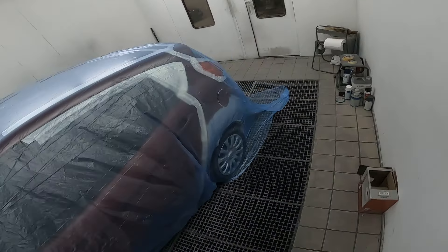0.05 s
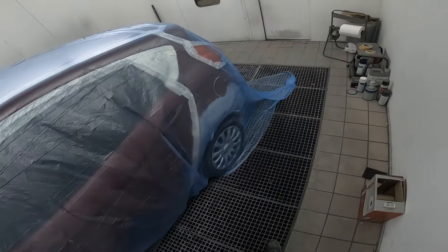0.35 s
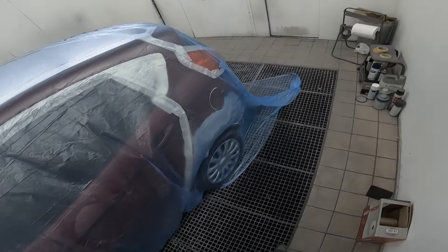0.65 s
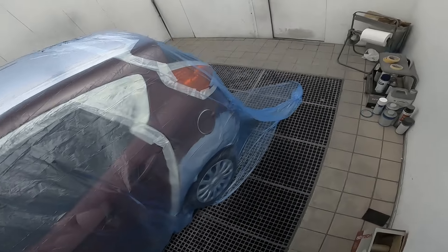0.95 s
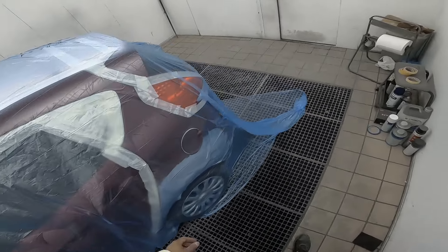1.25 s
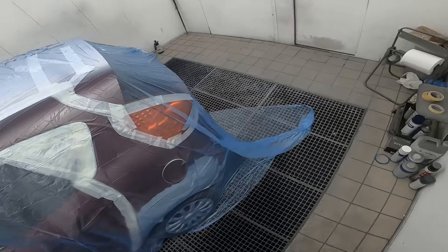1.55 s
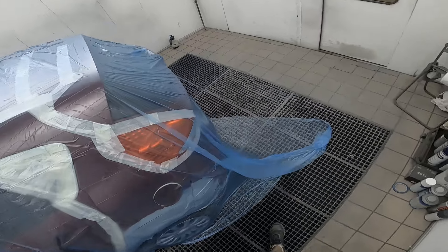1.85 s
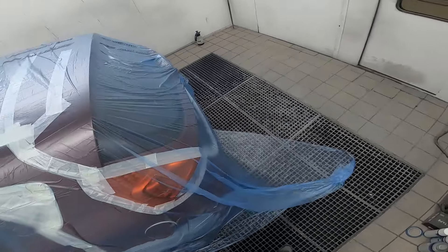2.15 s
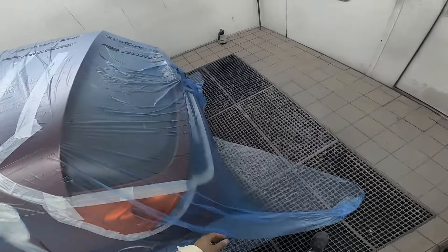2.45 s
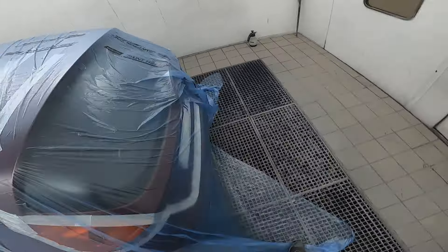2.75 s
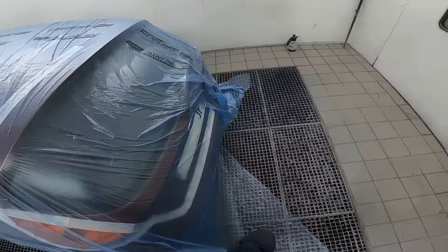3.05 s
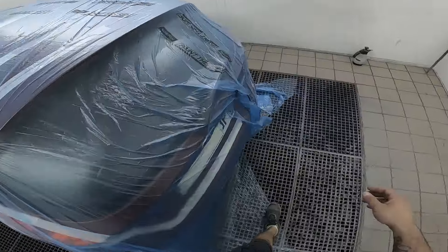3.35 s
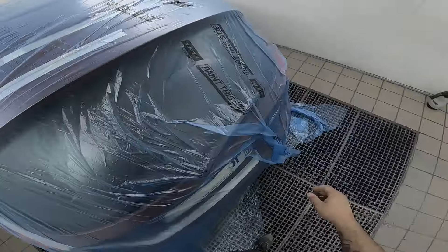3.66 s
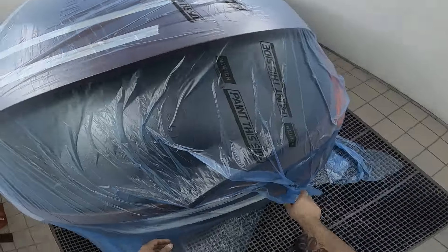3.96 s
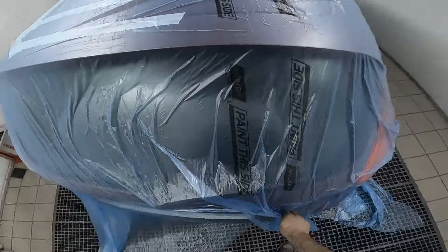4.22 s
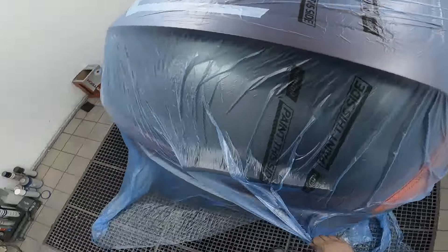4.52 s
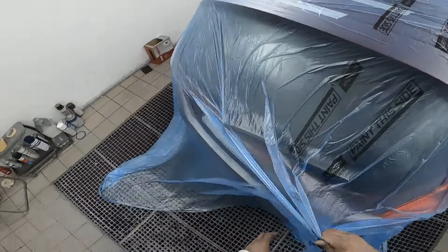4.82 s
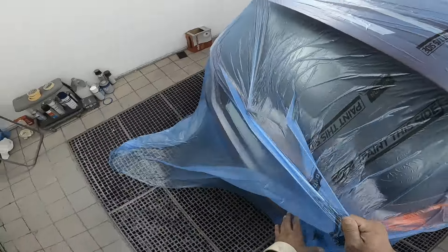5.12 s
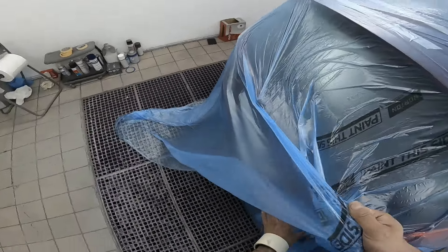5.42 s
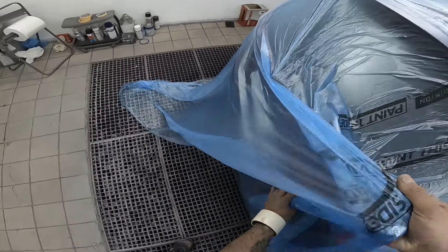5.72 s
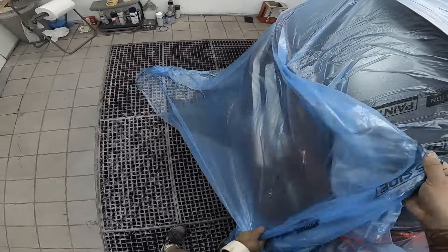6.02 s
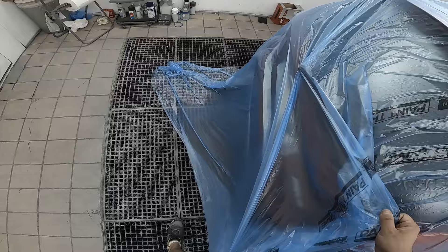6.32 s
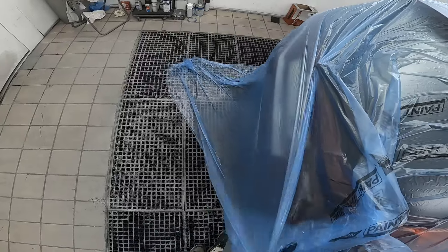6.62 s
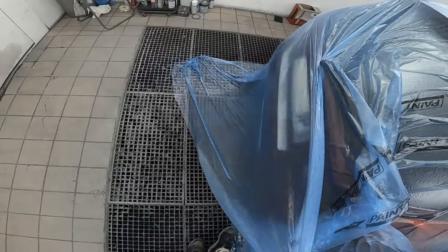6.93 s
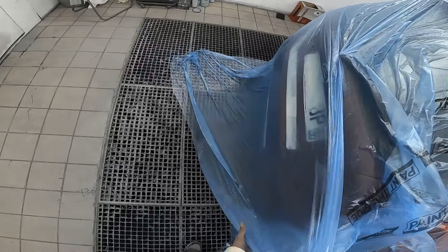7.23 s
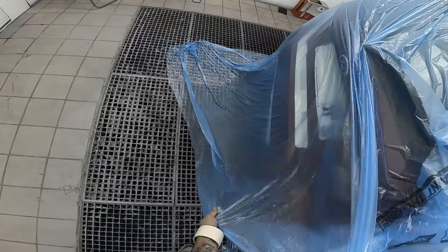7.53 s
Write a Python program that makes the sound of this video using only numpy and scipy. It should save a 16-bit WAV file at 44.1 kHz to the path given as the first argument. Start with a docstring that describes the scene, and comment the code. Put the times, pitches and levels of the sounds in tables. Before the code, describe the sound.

Deep, steady ventilation fills a car painting booth with rumble, hum and a light hiss of air, its tone changing slightly as the microphone is carried along. Shoes and clothes rustle faintly at the start. Later, thin plastic sheeting over a car is pulled several times nearby, slithering and crinkling under the fan noise. The strongest pulls bring a few crisp snaps, reflected by the hard walls.

```python
"""In a paint booth, a big fan hums, roars and hisses while the microphone walks round a masked car.
The wheel throbs, its blades hum and turbulent air rushes through the ducts and grates.
The walk passes through the booth's standing waves, so the boom shifts in pitch.
Soft shoe scuffs and clothing brushes come first; later a hand draws out the thin masking film.
As it slides, tiny wrinkles flip in a dense, soft crinkle with a few snaps, echoed by the hard walls."""
import sys
import numpy as np
from scipy import signal
from scipy.fft import rfft, irfft, next_fast_len
from scipy.io import wavfile
from scipy.ndimage import uniform_filter1d

SR = 44100
rng = np.random.default_rng(int(sys.argv[2]) if len(sys.argv) > 2 else 0)


def put_to_file(sound):
    """Save the sound as 16-bit audio at rate SR, in the file named by the first command-line argument."""
    columns = np.atleast_2d(sound).T  # one column per channel
    safe = np.clip(columns, -1, 1)
    whole_steps = np.round(safe * 32767)
    wavfile.write(sys.argv[1], SR, whole_steps.astype(np.int16))


N = 343098
TIME = np.arange(N) / SR
PADDED = next_fast_len(N + 4096, True)
HZ = np.fft.rfftfreq(PADDED, 1 / SR)


def amp(db):
    """Decibels to gain."""
    return 10 ** (np.asarray(db) / 20)


def unit_rms(x):
    """Scales to an rms of one."""
    return x / np.sqrt(np.mean(x ** 2) + 1e-20)


def curve(rows, hz, column=1):
    """One column of a table, interpolated on a log-frequency axis."""
    columns = np.transpose(rows)
    return np.interp(np.log(hz + 1), np.log(columns[0] + 1), columns[column])


def coloured(x, gain):
    """Filters by a gain for each frequency."""
    return irfft(rfft(x, PADDED) * gain, PADDED)[..., :N]


def wander(rate_hz):
    """A smooth random drift with an rms of one."""
    return unit_rms(coloured(rng.standard_normal(PADDED), np.exp(-(HZ / rate_hz) ** 2)))


def swell(at, spread):
    """A bell-shaped fade in and out, reaching 1 at the given second."""
    return np.exp(-0.5 * ((TIME - at) / spread) ** 2)


def gesture(at, rise, hold, decay, steepness=1.1):
    """A move builds up to a moment, holds, and dies away."""
    building = (np.maximum(at - TIME, 0) / rise) ** steepness
    dying = np.maximum(TIME - at - hold, 0) / decay
    return np.exp(-building - dying)


def ports(pair, image):
    """Turns two unrelated signals into what two close microphone ports hear."""
    common, separate = rfft(pair, PADDED)
    coherence = np.clip(curve(image, HZ), 0, 1)
    lead = curve(image, HZ, column=2)
    pan = amp(curve(image, HZ, column=3) / 2)
    right = (coherence * common + np.sqrt(1 - coherence ** 2) * separate) * np.exp(-1j * lead)
    return irfft(np.array([common * pan, right / pan]), PADDED)[:, :N]


def airflow(level_db=-19.5, splits_hz=(48, 135, 1400), gust_db=1.0, gust_hz=5):
    """Turbulent air rumbles, booms, roars and hisses; all but the hiss flutter in gusts."""
    # Tone of the air in fan and grates. Each row: frequency in Hz, relative level in dB.
    spectrum = [(8, -26.5), (22, -8), (42, -5.5), (85, -2.5), (160, -6.5), (305, -13.5), (450, -22.5),
                (790, -30.5), (1000, -32), (2000, -43), (4800, -49.5), (7700, -59), (10500, -72.5),
                (12500, -74.5), (15500, -91)]
    # Duct rumble, boom, roar and grate hiss each swell or fade around one spot on the walk.
    # Each row: usual gain in dB, time at the spot and spread in seconds, change there in dB.
    bands = [(-2.5, 8.2, 1, 4), (0.5, 5.2, 0.51, -0.5), (.5, 3.5, 1.2, -0.5), (0.9, 2, 1.36, -2.5)]
    air = amp(level_db) * unit_rms(coloured(rng.standard_normal((2, N)), amp(curve(spectrum, HZ))))
    lowpasses = [1 / (1 + (HZ / edge) ** 8) for edge in splits_hz]
    bandpasses = np.diff(lowpasses, axis=0, prepend=0, append=1)
    gains = [amp(db + change_db * swell(at, spread)) for db, at, spread, change_db in bands]
    rumble, boom, roar, hiss = (coloured(air, band) * gain for band, gain in zip(bandpasses, gains))
    return (rumble + boom + roar) * amp(gust_db * wander(gust_hz)) + hiss


def fan(shaft_hz=16.152, blades=10, sway_rad=0.048, sway_hz=0.66):
    """The unbalanced wheel throbs at one and two times its speed; the passing blades hum above it."""
    # Fan tones, low to high, dipping at a node or swelling at an antinode on the walk.
    # Each row: usual level in dB, time at the spot and spread in seconds, change there in dB.
    tones = [(-24.5, 5, 0.72, 0), (-27, 0.77, 1.5, -15.5), (-28.5, 1.3, 0.1, -7.5), (-44.5, 3.75, 0.29, 9)]
    angle = 2 * np.pi * (shaft_hz * TIME + rng.random())
    out = np.zeros(N)
    for order, (db, at, spread, change_db) in zip((1, 2, blades, 2 * blades), tones):
        # the phase of each tone sways as the microphone moves
        tone = np.sqrt(2) * np.sin(order * angle + sway_rad * wander(sway_hz))
        out += amp(db + change_db * swell(at, spread)) * tone
    return out


def standing_waves():
    """The fan drives narrow room modes, each loudest as the microphone passes its antinode."""
    # Booth modes. Each row: pitch and width in Hz, level in dB, antinode time and spread in seconds.
    modes = [(49, 4.1, -35, 0.2, 2.3), (57.4, 5.8, -19, 0.43, 1.5), (75.8, 3.9, -20, 2.27, 0.31),
             (75.4, 2.9, -28.5, 4.6, 1.5), (85.4, 6.5, -21, 2, 0.38), (105.2, 6.4, -18.5, 0.98, 0.42),
             (97.54, 4.5, -24.5, 4.3, 1.35), (97.8, 14, -21.5, 7.27, 0.26), (128.5, 7, -23.5, 1.45, 0.48),
             (129, 3.2, -22.5, 3.15, 0.64), (160.8, 1.3, -27.5, 0.64, 0.23), (152.2, 5, -25.5, 4.49, 0.2),
             (159.8, 14, -22, 7.38, 0.54), (173, 6, -22, 4.53, 0.18), (178.8, 6.5, -26.5, 5.24, 1.3),
             (211.8, 5, -32.5, 3.6, 2.7), (232.4, 8.1, -29, 5.4, 1.33), (251.9, 3.4, -33.5, 1.42, 0.85),
             (255.4, 7.1, -27.5, 6.57, 1.18), (301.5, 3.7, -30, 2.85, 0.32), (322.8, 8, -31.5, 3.62, 0.58),
             (371.6, 12, -35.5, 6.42, 0.75), (404, 10.4, -40, 7.1, 5.4), (491, 24.4, -39, 11.8, 6.8),
             (506, 5, -40, 1.2, .25), (576, 13, -49, 2.5, 2), (655.4, 30, -46, 6.3, 3.1),
             (934, 30, -51, 5, 4.6)]
    drive = rfft(rng.standard_normal(PADDED))
    out = np.zeros(N)
    for hz, width, db, antinode, spread in modes:
        mode = irfft(drive / (1 + 1j * (HZ - hz) / width) ** 2, PADDED)[:N]
        nearness = swell(antinode, spread)
        rms_nearby = np.sqrt(np.average(mode ** 2, weights=nearness ** 2))
        out += amp(db) * nearness * mode / rms_nearby
    return out


def movements(settle_s=0.14, grip_s=4.3, grip_rise_s=0.07, slither_db=-49.5):
    """Effort and crispness (-1 dull to 1 bright) of shoes and clothes, then of the hand on the film."""
    # Two faint rustles, then draws of the sheet.
    # Each row: time at full strength, build and hold in seconds, level in dB, crispness.
    draws = [(0.094, 0.11, 0.2, -63, -.4), (3.62, 0.25, .08, -59, -.45), (4.522, 0.095, 0.07, -42, 0.0054),
             (4.97, 0.26, 0.1, -41, -0.085), (5.303, 0.05, 0.075, -47.5, 0.15),
             (6.072, 0.082, 0.037, -37.5, -0.023), (6.209, 0.054, 0.024, -38.5, 0.1),
             (6.31, 0.033, 0.05, -35.5, 0.13), (6.669, 0.21, 0.27, -41, -0.077),
             (7.097, .1, 0.17, -46.5, -0.029), (7.742, 0.15, .03, -38, 0.075)]
    # Soft shoe scuffs and clothing brushes come first, then quick flicks of the film.
    # Each row: time and decay in seconds, level in dB, crispness.
    touches = [(.265, .02, -55.5, -0), (.385, 0.022, -53.5, -0), (.415, 0.024, -46, -.55),
               (.82, 0.054, -61.5, 0.2), (2.795, 0.035, -58.5, 0.6), (2.88, .04, -61.5, .3),
               (3.74, 0.044, -59, -0.1), (4.512, 0.022, -42, 0), (5.105, 0.018, -48, 0),
               (5.262, .018, -52, 0.2), (5.752, 0.024, -44.5, 0), (5.83, .016, -50, .7),
               (5.858, 0.027, -43, 0.3), (6.272, 0.012, -33, -0.15), (6.382, 0.018, -33.5, -0.16)]
    moves = [amp(db) * gesture(at, build, hold, settle_s) for at, build, hold, db, _ in draws]
    moves += [amp(db) * gesture(at, rise=0.6 * decay, hold=0.5 * decay, decay=decay)
              for at, decay, db, _ in touches]
    # once gripped, the sheet keeps slithering softly between draws
    slither = amp(slither_db) * np.clip((TIME - grip_s) / grip_rise_s, 0, 1)
    effort = np.linalg.norm([*moves, slither], axis=0)  # their powers add
    bite = sum(move * crispness for move, (*_, crispness) in zip(moves, draws + touches))
    return effort, bite / (effort + 1e-9)


def wrinkles(effort, per_s=6000, size_db=2.5, clump_db=1, clump_hz=70):
    """Tiny wrinkles flip in clumps, more of them the harder the move."""
    rate = per_s * np.sqrt(effort / effort.max()) + per_s / 10
    sizes = amp(size_db * np.minimum(rng.exponential(1, (2, N)), 4))
    signs = rng.choice([-1, 1], (2, N))
    flips = rng.random((2, N)) < rate / SR
    clicks = sizes * signs * flips / np.sqrt(rate)
    return unit_rms(clicks) * amp(clump_db * wander(clump_hz))


def scuffs_and_film(slide_db=-1.5, room_db=-6, snap_db=3.5, crisp_hz=3500):
    """Early scuffs, then the film's wrinkles, sliding hiss and snaps, all echoed by the booth."""
    # Tone of the crinkle. Each row: frequency in Hz, relative level in dB.
    spectrum = [(300, -10), (1000, -4), (2000, -3.5), (4200, -1.5), (5500, -4.5), (7600, -9),
                (10000, -17.5), (13000, -18), (15500, -29.5)]
    # Stereo image of the crinkle. Each row: frequency in Hz, coherence, left lead in radians,
    # left minus right in dB.
    image = [(1000.0, 0.75, -0.16, 2.2), (2200.0, 0.72, -0.76, 1.4), (3500.0, 0.64, -0.94, 0.1),
             (5200.0, 0.43, -1.3, -1.4), (7000.0, 0.42, -2.73, -0.3), (9500.0, 0.27, -1.74, -4.4),
             (12500.0, 0.37, -3.09, 0.9), (15000.0, 0.25, -3.72, -2.9)]
    effort, crispness = movements()
    rustle = effort * (wrinkles(effort) + amp(slide_db) * rng.standard_normal((2, N)))
    # a quick move bends the film more sharply, which adds treble; a soft brush has less
    treble = coloured(rustle, HZ ** 2 / (HZ ** 2 + crisp_hz ** 2))
    colour = unit_rms(amp(curve(spectrum, HZ)))
    crinkle = coloured(rustle + crispness * treble, colour) + ringing_panels()
    snaps = amp(snap_db) * coloured(creases(), colour)
    echo = amp(room_db) * booth_reverb(crinkle + snaps)
    return ports(crinkle + echo, image) + snaps


def booth_reverb(x):
    """Dense reflections from hard walls; the treble rings longer than the mids."""
    # Ring of the tiled booth. Each row: frequency in Hz, seconds to fall by 60 dB.
    ring_times = [(500, 0.56), (4000, 0.99), (14000, 0.94)]
    hz, t, noise = signal.stft(rng.standard_normal((2, SR)), SR, nperseg=256)
    fade = amp(-60 * t / curve(ring_times, hz)[:, None])
    tail = signal.istft(noise * fade, SR, nperseg=256)[1]
    return signal.fftconvolve(x, tail / np.linalg.norm(tail[0]), axes=1)[:, :N]


def creases(decay_s=0.00034, length=512):
    """A single crease snaps over in a millisecond burst of buckling, off to one side."""
    # Crease snaps. Each row: start in seconds, relative peak in dB, left minus right in dB.
    snaps = [(.2686, -37, -8), (5.4092, -30, -1), (5.7495, -30, -2), (6.0445, -28, -11.5), (6.2664, -23, 3),
             (6.2783, -31, 2), (6.3984, -31, -6)]
    out = np.zeros((2, N))
    for at, db, pan_db in snaps:
        burst = rng.standard_normal((2, length)) * np.exp(-np.arange(length) / SR / decay_s)
        gains = amp([[db + pan_db / 2], [db - pan_db / 2]])
        start = round(at * SR)
        out[:, start:start + length] += burst / abs(burst).max() * gains
    return out


def ringing_panels():
    """A stretch of film hisses in a band of its own: high when pulled taut, low as it falls slack."""
    # Ringing stretches. Each row: peak time and spread in seconds, centre and width in Hz, level in dB.
    stretches = [(5.04, .07, 5200, 500, -50), (6.25, .07, 7300, 600, -46.5),
                 (6.283, .016, 4900, 500, -38.5), (6.46, .05, 1400, 600, -43),
                 (6.82, .12, 5000, 700, -48.5)]
    out = np.zeros((2, N))
    for at, spread, hz, width, db in stretches:
        band = coloured(rng.standard_normal((2, N)), 1 / (1 + ((HZ - hz) / width) ** 2))
        out += amp(db) * swell(at, spread) * unit_rms(band)
    return out


def scene():
    """Air, fan tones and room modes under the scuffs and the handled film."""
    # Stereo image of the air. Each row: frequency in Hz, coherence, left lead in radians,
    # left minus right in dB.
    image = [(30.0, 0.991, 0.4, -5.6), (90.0, 0.996, 0.37, -2.0), (200.0, 0.982, 0.4, 0.8),
             (400.0, 0.91, 0.3, 1.8), (700.0, 0.72, 0.06, 3.2), (1100.0, 0.7, -0.19, 3.1),
             (2200.0, 0.63, -0.73, 4.2), (4500.0, 0.32, -0.4, 1.7), (7000.0, 0.12, -3.28, 0.8),
             (12000.0, 0.23, -3.08, 0.9)]
    common, diffuse = airflow()
    common = common + fan() + standing_waves()  # long waves reach both ports
    return ports(np.array([common, diffuse]), image) + scuffs_and_film()


def record(dry, bass_hz=260, knee_db=-20, squeeze=0.67, smooth_s=0.016, top_hz=15700):
    """The microphone colours the treble, a compressor holds down bass swells, and the top is cut."""
    # Ripple of the microphone's ducts. Each row: frequency in Hz, gain in dB.
    ripple = [(4500, 0), (5600, 1.5), (6600, 0), (7800, 3), (8500, 0), (10200, 3), (11000, -1.5),
              (12500, -3)]
    heard = coloured(dry, amp(curve(ripple, HZ)))
    bass = coloured(heard, 1 / (1 + (HZ / bass_hz) ** 2) ** 2)
    window = int(smooth_s * SR) + 1
    bass_power = uniform_filter1d((bass ** 2).mean(0), window)
    bass_db = 10 * np.log10(abs(bass_power) + 1e-12)
    over_db = uniform_filter1d(np.maximum(bass_db - knee_db, 0), window)
    compressed = heard - bass * (1 - amp(-squeeze * over_db))
    lowpass = signal.firwin(511, top_hz, window=("kaiser", 9), fs=SR)
    return signal.oaconvolve(compressed, lowpass[None], "same")


dry = scene()
out = record(dry)
put_to_file(out)
```